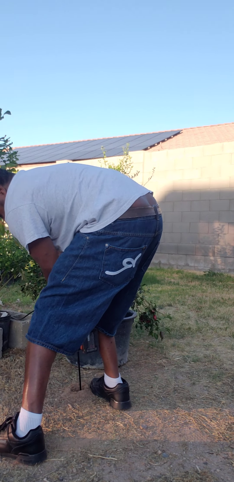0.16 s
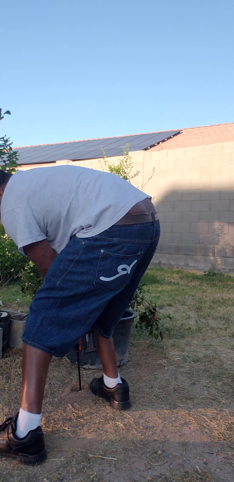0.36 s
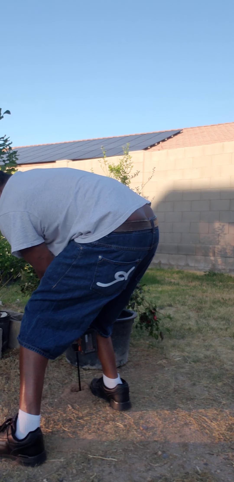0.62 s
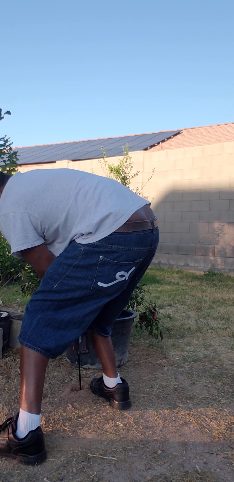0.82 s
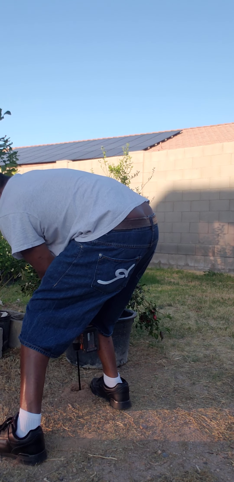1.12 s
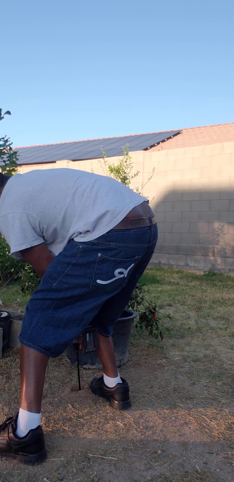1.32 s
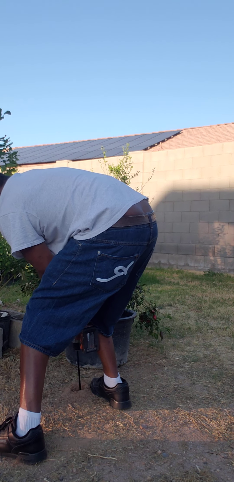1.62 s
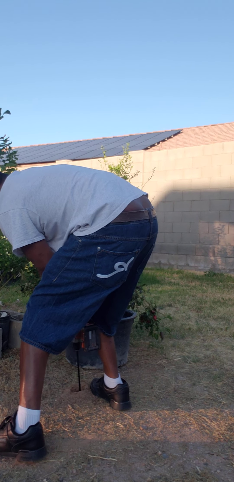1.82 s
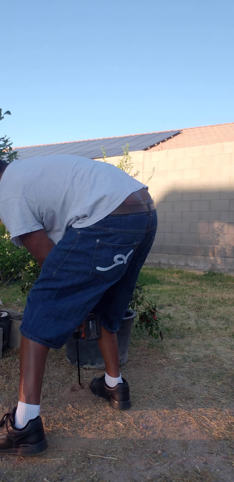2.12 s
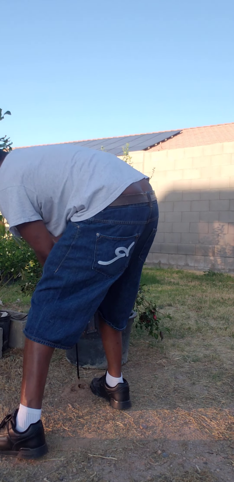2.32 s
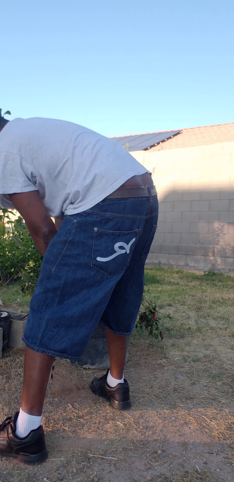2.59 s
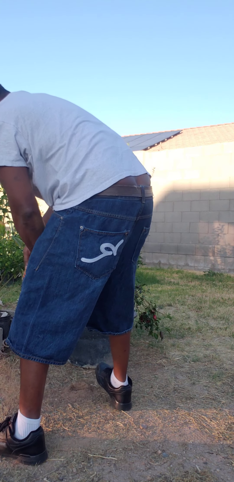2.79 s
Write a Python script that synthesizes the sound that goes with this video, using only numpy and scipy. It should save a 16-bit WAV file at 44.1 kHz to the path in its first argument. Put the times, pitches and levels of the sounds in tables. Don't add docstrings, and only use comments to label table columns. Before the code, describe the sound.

An auger drilling dry soil, close and left of centre in stereo. Until 0.75 s, only faint yard air, distant engine, low hum and tiny crackles. Gritty scraping then grows, with a stone knock at 0.9, clod cracks around 1.3, a squeak at 1.4 and crunches at 1.65. From 1.9 the bit whirs freely, clicks at 2.68, brakes by 2.75; sand trickles. Dull wall echo.

```python
import sys
import numpy as np
from scipy import signal
from scipy.fft import rfft, irfft
from scipy.io import wavfile

SR = 44100
rng = np.random.default_rng(int(sys.argv[2]) if len(sys.argv) > 2 else 0)


def master_out(mix):
    frames = np.transpose(np.atleast_2d(mix))
    ceiling = np.clip(frames, -1, 1)
    pcm = np.round(ceiling * 32767).astype(np.int16)
    wavfile.write(sys.argv[1], SR, pcm)


def invert_db(level):
    return 10 ** (np.asarray(level, dtype=float) / 20)


N = 130095
T = np.arange(N) / SR

# frequency in Hz, likeness from 0 to 1.
NEAR_LIKENESS = [(300, 0.99), (1000, 0.79), (2500, 0.52), (5000, 0.26), (12000, 0.17)]
# frequency in Hz, width in Hz, level in dB.
CLOD = [(435, 187, -2), (694, 300, 0), (1360, 650, -1), (2400, 1000, 0.5)]


def rms_one(x):
    return x / np.sqrt(np.mean(x ** 2) + 1e-20)


def in_time(rows):
    s, *columns = np.transpose(rows)
    return [np.interp(T, s, column) for column in columns]


def at_hz(points, hz):
    point_hz, value = np.array(points)[:, :2].T
    return np.interp(np.log(hz), np.log(point_hz), value)


def drift(rate):
    r = np.exp(-80 * np.pi * rate / SR)
    noise = rng.standard_normal(N // 40 + 2002)
    slow = signal.lfilter([1], [1, -2 * r, r * r], noise)[2000:]
    return np.interp(np.arange(N) / 40, np.arange(len(slow)), rms_one(slow - slow.mean()))


def resonate(x, table):
    out = 0
    for k, (hz, width, db) in enumerate(table):
        r = np.exp(-np.pi * width / SR)
        poles = [1, -2 * r * np.cos(2 * np.pi * hz / SR), r * r]
        gain = (-1) ** k * invert_db(db) / np.sqrt(width)
        out = out + gain * signal.lfilter([1 - r * r, 0, r * r - 1], poles, x)
    return out


def grains(rate, spread_db):
    born = rng.random((2, N)) < rate / SR
    size = invert_db(spread_db * np.minimum(rng.exponential(1, (2, N)), 5))
    return rms_one(born * size * rng.choice([-1, 1], (2, N)) + 1e-18)


def coloured(source, spectrum, likeness, patchy_db, patch_hz):
    lowest, highest = spectrum[0][0], 16200
    edges = np.geomspace(lowest, highest, 2 + int(4 * np.log2(highest / lowest)))
    out = 0
    for k, (low, high) in enumerate(zip(edges, edges[1:])):
        band = signal.butter(2, [low, high], "band", fs=SR, output="sos")
        mid, side = signal.sosfilt(band, source)
        hz = np.sqrt(low * high)
        alike = np.clip(at_hz(likeness, hz), 0, 1)
        gain = (-1) ** k * invert_db(at_hz(spectrum, hz) + patchy_db * drift(patch_hz))
        out = out + gain * (np.sqrt(1 + alike) * mid + np.sqrt(1 - alike) * side * [[1], [-1]])
    return out


def yard_air():
    # frequency in Hz, level in dB per Hz.
    yard = [(25, -14), (100, -16.5), (270, -26.5), (400, -40), (700, -48), (960, -42), (1800, -57),
            (15800, -65)]
    # frequency in Hz, likeness from 0 to 1.
    far_likeness = [(50, 0.93), (90, 0.96), (180, 0.91), (1000, 0.15), (8000, 0.052)]
    hiss = coloured(rng.standard_normal((2, N)), yard, far_likeness, 1.76, 4.9)
    return invert_db(-54) * rms_one(hiss)


def leaves():
    # frequency in Hz, width in Hz, level in dB.
    rustle = [(3650, 250, 3), (5070, 370, 2.5), (6700, 600, -17)]
    return invert_db(-79 + 1.8 * drift(8.8)) * rms_one(resonate(rng.standard_normal((2, N)), rustle))


def engine():
    # start in seconds, firing pitch in Hz, level in dB.
    revs = [(0, 52, -55), (.3, 54.5, -50), (.5, 57.3, -44), (.64, 61.3, -47), (.96, 64.2, -41.5),
            (1.14, 64.2, -43), (1.27, 61.5, -53), (1.45, 63, -43.5), (1.57, 60.8, -42), (1.68, 58.3, -48),
            (1.88, 55.2, -48), (2.13, 51.7, -54), (2.33, 50.8, -54), (2.55, 43, -53), (2.75, 42, -66)]
    # multiple of the firing pitch, level in dB.
    orders = [(2, -27), (3, -29)]
    hz, db = in_time(revs)
    phase = 2 * np.pi * np.cumsum(hz) / SR + 1.38
    overtones = sum(invert_db(d + 2 * drift(3.4)) * np.sin(k * phase) for k, d in orders)
    return np.sqrt(2) * invert_db(db) * (np.sin(phase) + overtones)


def compressor():
    # frequency in Hz, level in dB, wobble in dB, starting phase in radians.
    hum = [(37.5, -61, 1, 1.35), (74.8, -50, .5, 1.32), (113.4, -69, 2, 1.5), (150, -66, 2, 1.5)]
    # start in seconds, level change in dB.
    load = [(0, -1.5), (.15, 0.5), (.6, 2), (1.1, -1.5), (1.3, 0), (1.6, -2), (2.0, -4.5), (2.27, -7.5),
            (2.45, -1), (2.55, -5.5), (2.7, 2.5), (2.95, -1.5)]
    load_db, = in_time(load)
    out = np.zeros(N)
    for hz, db, wobble_db, start in hum:
        phase = 2 * np.pi * hz * T + 0.062 * drift(6.8) + start
        out += np.sqrt(2) * invert_db(db + load_db + wobble_db * drift(1.0)) * np.sin(phase)
    return out


def heel_thumps():
    # start in seconds, peak in dB, frequency in Hz, time to fall 60 dB in seconds.
    thumps = [
        (1.165, -39, 108, .2),
        (1.2, -44, 140, .25),
        (.912, -42, 200, .1),
        (1.29, -44, 275, .1),
    ]
    out = np.zeros(N)
    for s, db, hz, t60 in thumps:
        age = np.maximum(T - s, 0)
        out += invert_db(db - 60 * age / t60) * np.sin(2 * np.pi * hz * age)
    return out


def far_whine():
    # multiple of the pitch, level in dB.
    lines = [(14, -92), (15, -89), (16, -81), (17, -92), (18, -90)]
    pitch_hz = 58.83
    return sum(invert_db(db + 5.5 + 2.0 * drift(5.6)) * np.sin(2 * np.pi * k * pitch_hz * T + k * k)
               for k, db in lines)


def neighbourhood():
    low = engine() + compressor() + heel_thumps() + far_whine()
    return leaves() + low * invert_db([[.3], [-.3]]) + yard_air()


def whir():
    # start in seconds, level in dB.
    spin = [
        (1.9, -54),
        (1.97, -47.5),
        (2.19, -45.5),
        (2.4, -48.5),
        (2.66, -49),
        (2.705, -49),
        (2.73, -57.5),
        (2.84, -60),
        (2.95, -66),
    ]
    # frequency in Hz, level in dB per Hz.
    hiss_colour = [(400, -23.5), (680, -23.5), (950, -18), (2800, -20.5), (5000, -6.5), (7000, -12.5),
                   (12500, -28), (15800, -23)]
    # frequency in Hz, level in dB relative to the hiss.
    gear_lines = [(5472, -13), (6467, -27), (7600, -29)]
    gear_hz = 32.3
    db, = in_time(spin)
    db = db - 40 * (T < spin[0][0])
    whistles = sum(invert_db(d + 3.0 * drift(3.0)) * np.sin(2 * np.pi * hz * T + 1.8 * drift(6.0))
                   for hz, d in gear_lines)
    pulse_db = 0.5 * np.cos(2 * np.pi * gear_hz * T) + 0.37 * np.cos(4 * np.pi * gear_hz * T)
    hiss = rms_one(coloured(grains(9000, 2.8), hiss_colour, NEAR_LIKENESS, 0.89, 11.0))
    return invert_db(db + 3.0 + pulse_db) * (hiss + whistles)


def squeaks():
    # start in seconds, peak in dB, pitch in Hz, length in seconds.
    stone_squeaks = [
        (1.394, -19, 4163, 0.0087),
        (1.5, -37, 4150, .004),
        (1.365, -34, 4100, 0.0065),
        (1.2, -37.5, 3600, 0.0025),
        (2.1, -37, 4200, .003),
        (1.2, -44, 4600, 0.0077),
        (1.375, -34, 4200, .004),
        (1.5, -27, 4600, 0.0023),
    ]
    rubs = [
        (1.042, -46, 1100, .012),
        (1.11, -48, 1440, .045),
        (1.087, -45, 3000, .014),
        (1.37, -48, 1300, .03),
    ]
    # frequency in Hz, level in dB.
    modes = [(1300, -27), (2780, -18), (5370, -25), (8250, -15.5), (9460, -22), (10800, -26)]
    rise_s, t60_s, octave_db = 0.0034, 0.024, -40
    out = np.zeros(N)
    for s, db, hz, length in stone_squeaks + rubs:
        age = np.maximum(T - s, 0)
        shape = np.minimum(age / rise_s, 1) * invert_db(db - 60 * np.maximum(age - length, 0) / t60_s)
        out += shape * (np.sin(2 * np.pi * hz * age) + invert_db(octave_db) * np.sin(4 * np.pi * hz * age))
    s, db, _, _ = stone_squeaks[0]
    age = np.maximum(T - s - .002, 0)
    shake = np.minimum(age / 0.0016, 1) * invert_db(db - 60 * np.maximum(age - .004, 0) / .02)
    out += shake * sum(invert_db(d + 3.0 * drift(150)) * np.sin(2 * np.pi * hz * age) for hz, d in modes)
    return out * invert_db(0.8 * drift(200)) * invert_db([[-.6], [.6]])


def stones():
    # start in seconds, peak in dB.
    strikes = [
        (.9102, -24),
        (1.6515, -42),
    ]
    # frequency in Hz, width in Hz, level in dB.
    ring = [(1600, 450, -3), (2500, 600, .5), (4400, 400, -2)]
    knocks = np.zeros(N)
    for s, db in strikes:
        at = ((s + np.array([0, .0011, .0021])) * SR).astype(int)
        knocks[at] = invert_db(db + 46) * np.array([1, -1, .8])
    return resonate(knocks, ring)


def ticks():
    # start in seconds, peak in dB, dull part in dB relative to it.
    contacts = [(.0905, -52, -20), (.3065, -53, -12), (.9104, -24, -4), (.9116, -23, -4), (1.2752, -24, -8),
                (1.2858, -26, 0), (1.3030, -18, -8), (1.3043, -20, -2), (1.3062, -21, -6),
                (1.6512, -28, -12), (1.6524, -23, -10), (1.6553, -25, -10), (1.6695, -28, -6),
                (1.6715, -27, -8), (1.6755, -30, -4), (1.682, -29, -12), (2.6803, -25, -18),
                (2.6828, -38, -8), (2.858, -40, -30), (2.8905, -45, -10), (2.909, -49, -5)]
    # frequency in Hz, width in Hz, level in dB.
    ring = [(3100, 800, -4), (4600, 1100, 0), (6100, 1600, -4), (10000, 3500, -10)]
    s, db, dull_db = np.transpose(contacts)
    unit = np.arange(400) == 0
    out = 0
    for body, level_db in ((ring, db), (CLOD, db + dull_db)):
        clicks = np.full(N, 1e-18)
        clicks[(s * SR).astype(int)] = invert_db(level_db)
        out = out + resonate(clicks, body) / np.abs(resonate(unit, body)).max()
    return out


def cracks():
    # start in seconds, peak in dB, dull part in dB relative to it, time to fall 60 dB in seconds.
    breaks = [(0.089, -48, -19, 0.075), (0.118, -56.5, -17, 0.17), (.1225, -58, -19, 0.039),
              (.265, -64, -20, .015), (.3065, -56, -8, 0.028), (0.9099, -20, -5, 0.029),
              (0.94, -33.5, -2, 0.045), (1.2622, -28.5, -24, 0.071), (1.272, -25, -14.5, .04),
              (1.2846, -24.5, 4, 0.016), (1.2896, -25.5, -25, 0.047), (1.3022, -19.5, -6.5, 0.04),
              (1.334, -34, -1, 0.042), (1.379, -30, -8.5, 0.075), (1.6488, -30.5, -26, 0.048),
              (1.6663, -37.5, -3.5, 0.1), (1.677, -39, -5, 0.053), (1.761, -31.5, -10, 0.09),
              (1.864, -29.5, -30, 0.15), (2.6794, -31, -10, 0.028), (2.683, -42.5, -9, 0.069),
              (2.6956, -47, -4.5, 0.069), (2.72, -59, 1.5, .5), (2.858, -50, -25, .02),
              (2.882, -53, -28, .08), (2.884, -50, -2.5, 0.3)]
    # frequency in Hz, level in dB per Hz.
    snap = [(2600, -8.5), (3500, -9), (5000, 1), (7000, -7.5), (10000, -12.5), (15800, -33)]
    bright, dull, contacts = np.zeros(N), np.zeros(N), grains(12000, 2.1)
    plain_bright = np.std(coloured(contacts, snap, NEAR_LIKENESS, 0, 5))
    plain_dull = np.std(resonate(contacts[0], CLOD))
    for s, db, dull_db, t60 in breaks:
        age = np.maximum(T - s, 0)
        shape = (T >= s) * np.minimum(age / 0.00026, 1) * invert_db(db - 60 * age / max(t60, .004))
        bright += shape
        dull += shape * invert_db(dull_db)
        contacts[0, int((s + .0005) * SR)] = invert_db(8.5)
    splinters = coloured(contacts * bright, snap, NEAR_LIKENESS, 0, 5) / plain_bright
    body = resonate(contacts[0] * dull, CLOD) / plain_dull
    return invert_db(-6.5) * splinters + invert_db(-5.0) * body


def grit():
    # start in seconds, level in dB.
    bite = [(.72, -79), (.765, -61.5), (.82, -45.5), (.98, -39.5), (1.03, -42.5), (1.09, -36), (1.17, -40),
            (1.235, -46), (1.28, -32.5), (1.32, -37.5), (1.385, -35.5), (1.42, -40.5), (1.5, -39),
            (1.63, -44.5), (1.67, -34.5), (1.7, -41), (1.75, -37), (1.845, -42), (1.87, -38), (1.9, -39.5)]
    # frequency in Hz, level in dB per Hz.
    sand_colour = [(300, -15), (650, -23), (1000, -19), (1500, -14.5), (2500, -15), (4600, -3),
                   (7000, -10.5), (15800, -27)]
    # frequency in Hz, width in Hz, level in dB.
    shaft = [(675, 60, -32), (1420, 60, -34), (4166, 70, -34), (5790, 90, -31)]
    release_db_per_s = 450
    db, = in_time(bite)
    db = db - 40 * (T < bite[0][0]) - release_db_per_s * np.maximum(T - bite[-1][0], 0)
    sand = grains(7000 * invert_db(1.5 * drift(25)), 2)
    body = rms_one(coloured(sand, sand_colour, NEAR_LIKENESS, 1.3, 12.5))
    ringing = 12 * resonate(sand[0] * invert_db(2.5 * drift(12)), shaft)
    return invert_db(db + 2.5 + 0.5 * drift(23)) * (body + ringing)


def edged(x):
    # start in seconds, level change in dB.
    edge = [(.78, -6.5), (.84, -7), (.9, 1), (1.38, 1), (1.41, 2), (1.47, 1.5), (2.75, -1), (2.86, 3),
            (2.9, 11), (2.95, 5)]
    band = signal.butter(2, [7500, 14000], "band", fs=SR, output="sos")
    return x + (invert_db(in_time(edge)[0]) - 1) * signal.sosfiltfilt(band, x)


def left_port(x):
    # frequency in Hz, phase the left leads by in radians.
    ports = [(0, 0), (1500, 0.46), (2300, -1.4), (3900, -1.62), (5250, -1.5), (8180, -6.5), (12500, -9.5),
             (16500, -12.5)]
    # frequency in Hz, level the left gains in dB.
    body_shadow = [(200, -1.5), (700, 2), (2400, -0.5), (4400, 0.5), (8100, -5.5), (10500, 0.5),
                   (15000, -1.5)]
    size = N + 905
    hz = np.fft.rfftfreq(size, 1 / SR)
    lead = np.interp(hz, *np.transpose(ports))
    shadow = invert_db(at_hz(body_shadow, hz + 1))
    return irfft(rfft(x, size) * np.exp(1j * lead) * shadow, size)[:N]


def scene():
    left_louder_db, wall_db = 3.5, -18.5
    wall = int(.018 * SR)
    drill = edged(grit() + whir()) + cracks() + stones()
    drill = drill * invert_db(np.array([[.5], [-.5]]) * left_louder_db)
    echo = invert_db(wall_db) * signal.lfilter([.6], [1, -.4], drill[::-1])
    drill[:, wall:] += echo[:, :N - wall]
    heard = np.array([left_port(drill[0]), drill[1]])
    return heard + ticks() * invert_db([[1.5], [-1.5]]) + squeaks() + neighbourhood()


def band_limit(x):
    return signal.sosfilt(signal.butter(12, 16920, fs=SR, output="sos"), x)


def record(dry):
    # frequency in Hz, width in Hz, level in dB.
    mic = [(3480, 460, 2), (5100, 790, 3), (6470, 520, 4), (8140, 1490, -10), (9280, 1200, 3.5),
           (15340, 890, 9), (4180, 300, -0.5)]
    dry = np.pad(dry, ((0, 0), (4000, 0)), "reflect", reflect_type="odd")
    for hz, width, db in mic:
        w, a = 2 * np.pi * hz / SR, invert_db(db / 2)
        k = np.pi * width / SR
        zeros = [1 + k * a, -2 * np.cos(w), 1 - k * a]
        poles = [1 + k / a, -2 * np.cos(w), 1 - k / a]
        dry = signal.lfilter(zeros, poles, dry)
    dry = signal.sosfilt(signal.ellip(12, .5, 60, 15720, fs=SR, output="sos"), dry)
    dry = signal.sosfilt(signal.butter(3, 30, "high", fs=SR, output="sos"), dry)
    return band_limit(dry[:, -N:] * np.minimum(T / 0.0114, 1))


dry = scene()
out = record(dry)
master_out(out)
```